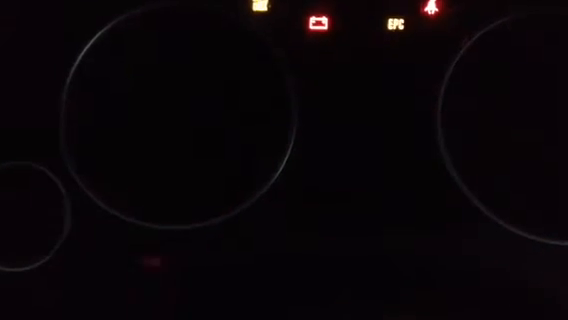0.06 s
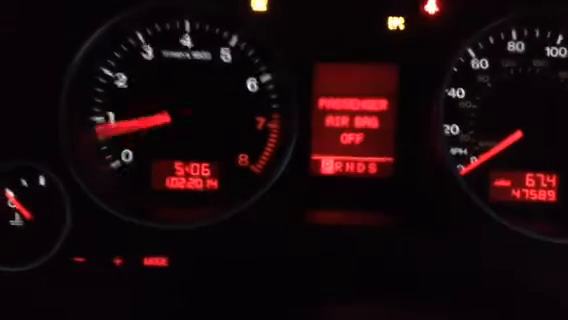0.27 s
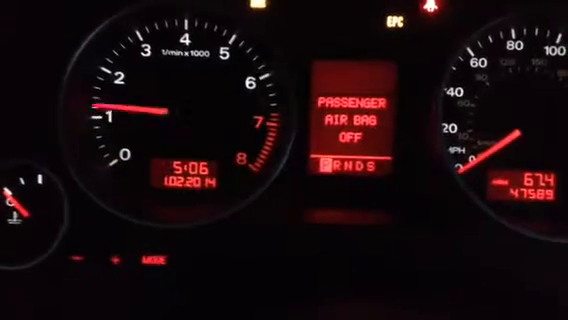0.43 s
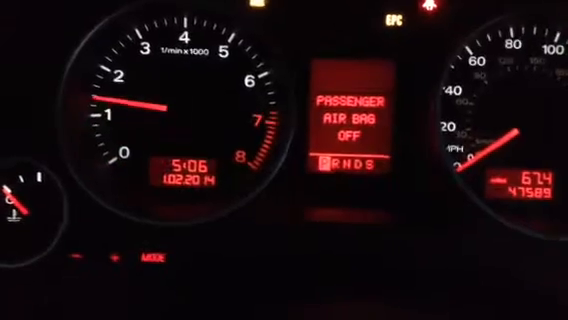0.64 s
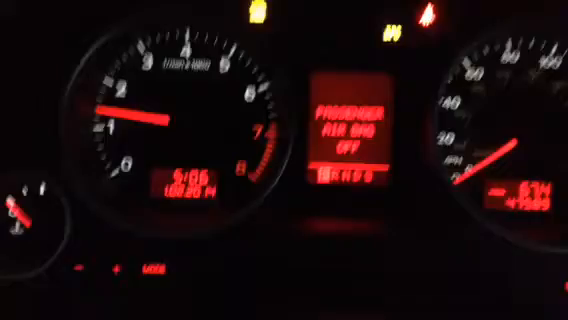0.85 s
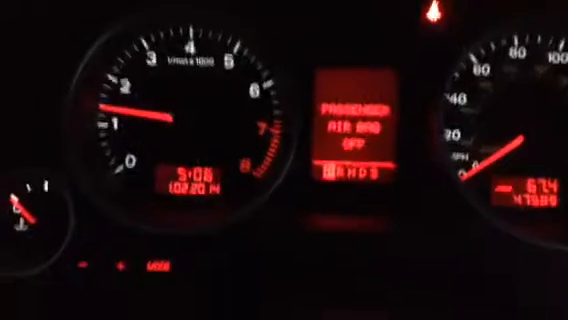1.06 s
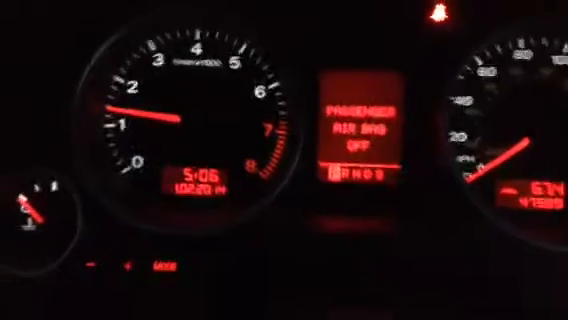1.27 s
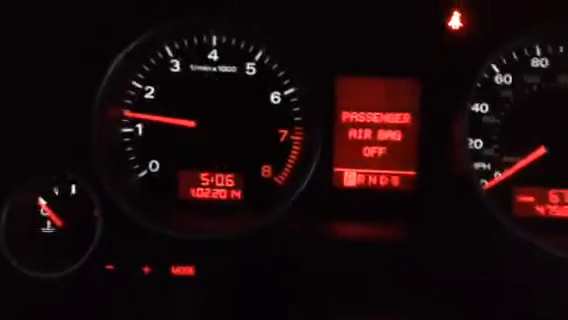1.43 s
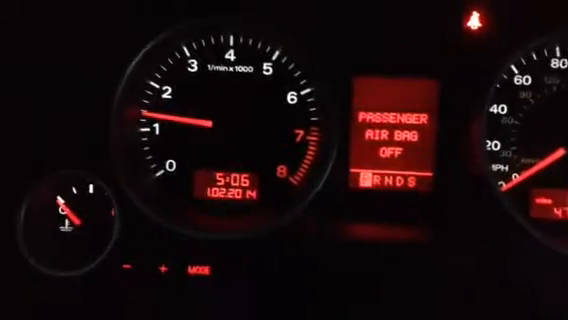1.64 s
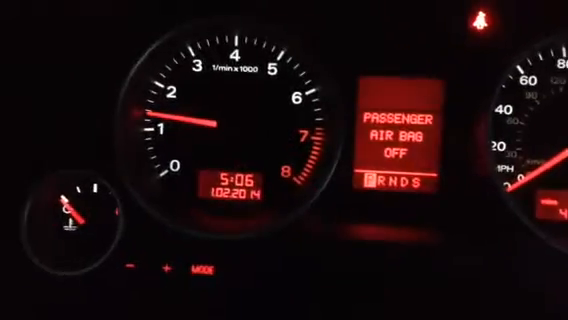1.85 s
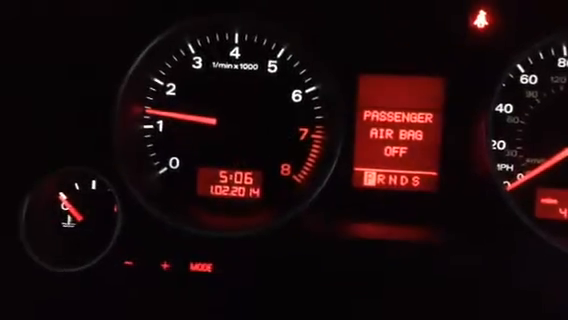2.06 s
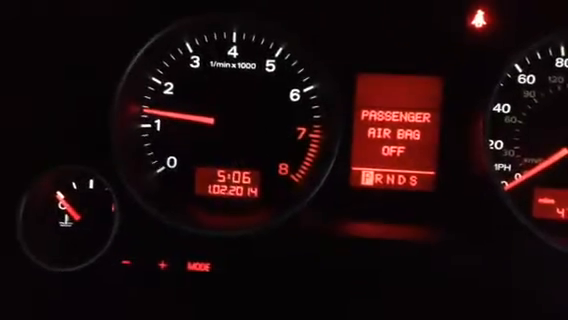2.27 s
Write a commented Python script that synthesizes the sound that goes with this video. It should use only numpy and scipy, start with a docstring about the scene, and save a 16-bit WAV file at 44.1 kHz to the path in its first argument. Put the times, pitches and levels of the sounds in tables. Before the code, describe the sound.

Car engine starting with a rumble, an ignition snap and jangling keys, then idling.

```python
"""A four-cylinder car engine starts, heard from the driver's seat. First it gathers speed, and hard firings
shake the car in a low rumble under a swelling hiss. The ignition key springs back against its stop with
a sharp snap, and the other keys on its ring collide and jangle. The hiss fades and a faint whine sinks
as the firings, filtered by the car body, settle to a fast, muffled idle. A few soft knocks sound in the
cabin along the way, the last with a brief ping."""
import sys
import numpy as np
from scipy import signal
from scipy.fft import rfft, irfft, next_fast_len
from scipy.io import wavfile
from scipy.ndimage import uniform_filter1d, map_coordinates

SR = 44100
rng = np.random.default_rng(int(sys.argv[2]) if len(sys.argv) > 2 else 0)


def persist_wave(psi):
    """Save psi, clipped to +-1, as 16-bit WAV."""
    counts = np.round(np.clip(psi, -1, 1) * 32767).astype(np.int16)
    wavfile.write(sys.argv[1], SR, np.atleast_2d(counts).T)


N = 101429

# narrow resonances of the car at idle: pitch_hz, level_db, width_hz
DRONE_MODES = [(185, -59.5, 9.81), (264.2, -54.5, 11.8), (613, -59.5, 3.5), (639, -60, 5.4),
               (849.4, -61.5, 11.5), (1210, -69.5, 10.5), (1286, -65.5, 16)]
# their common gain: time_s, gain_db
DRONE_GAIN = [(.3, -12), (.8, -0.5), (1.6, 2.5), (1.9, -2.5), (2.3, -5)]
# course of the whine: time_s, pitch_hz, level_db
WHINE_GLIDE = [(.45, 520, -77), (.58, 507, -47), (.72, 490.5, -53), (.95, 475, -53), (1.25, 464, -57.5),
               (1.7, 470, -54.5), (2.3, 450, -62)]

# knocks in the cabin: start_s, thud_db, tick_db
KNOCK_HITS = [(.164, -41, -36), (.169, -48, -36), (0.2183, -36.5, -37.5), (0.2234, -32, -35),
              (.575, -38, -41), (.859, -41.5, -58), (2.0235, -37.5, -48), (2.048, -34, -53)]
# short, dry bumps: start_s, peak_db
BUMP_HITS = [(0.2817, -25.5), (0.9766, -25), (2.0246, -39)]
# spectra of a thud, a tick and a bump: frequency_hz, relative_db
THUD_SPECTRUM = [(30, -43), (80, -24), (170, 8.5), (400, 9), (700, -11), (1400, -16.5), (4000, -24),
                 (12000, -54.5)]
TICK_SPECTRUM = [(30, -51.5), (300, -7), (1000, 2), (2500, -2), (5000, -7), (9000, -14), (15000, -28)]
BUMP_SPECTRUM = [(30, -36), (120, -6), (300, 2.5), (600, 2), (1200, -14), (2500, -14.5), (5000, -19),
                 (9000, -32.5), (15000, -45)]

# keys striking each other: start_s, clash_db, ring_db
KEY_HITS = [(0.4733, -40, -51), (0.5534, -44, -38), (.5718, -30.5, -32), (0.599, -35, -45),
            (0.6079, -26, -24), (.6548, -33.5, -42), (.6915, -39.5, -50), (.7055, -35, -34),
            (0.746, -43, -50), (0.8604, -48, -63), (1.0066, -39, -39.5), (1.206, -57, -67)]
# modes of the keys: pitch_hz, relative_db, t60_s
KEY_MODES = [(6590, -11.5, 0.1), (8430, -19, 0.077), (9500, -16, 0.17), (11100, -3.5, 0.076),
             (12610, -20, 0.064), (14550, -18, 0.19)]
# spectrum of their contact: frequency_hz, relative_db
CLASH_SPECTRUM = [(50, -51), (500, -23), (1500, -5), (3000, -11.5), (4500, -1.5), (5300, 1), (6700, 2),
                  (9000, 1), (10000, -4), (11200, -3), (12500, -9), (15000, -4)]
# single tones that ring out: start_s, pitch_hz, level_db, t60_s
KEY_PINGS = [(0.5525, 4530, -40, 0.1), (.556, 14560, -40, .25), (.704, 14550, -43, 0.2),
             (0.712, 8410, -40, 0.21), (2.049, 1875, -47.5, 0.42)]
CLATTER_FROM_S, CLATTER_TO_S, CLATTER_DB, CLATTER_SPREAD_DB = .555, 0.68, -42.5, 3

# contacts of the lock springing back: start_s, relative_db
LOCK_HITS = [(0.3563, -22), (.3576, -25), (.3592, -14.5), (0.361, -9), (0.3626, -9), (.3733, -31)]
# modes of the lock: pitch_hz, relative_db, t60_s
LOCK_MODES = [(696, -14, 0.07), (1170, -4.5, 0.049), (1318, -5, 0.045), (2137, 0, 0.02), (2930, -6, 0.048),
              (3770, -3.5, 0.027), (4450, -4, 0.029), (4880, 4.5, 0.032), (5210, -6.5, 0.037),
              (5880, 3, 0.03), (6310, 0, 0.04), (6630, -5, .028), (7930, -9.5, .03), (10140, -5, 0.022)]
# spectrum of one contact: frequency_hz, relative_db
CRACK_SPECTRUM = [(30, -58), (200, -41.5), (500, -26.5), (750, -6.5), (2000, -7), (4200, -0.5), (5100, 2.5),
                  (6500, -1), (8500, -4.5), (10000, -6), (11700, -12), (12700, -15), (15000, -19.5)]
LOCK_GAIN_DB, LOCK_RING_DB = -3, -11.5

# spectra of the start's rumble and hiss: frequency_hz, relative_db
RUMBLE_SPECTRUM = [(30, -43), (80, -21.5), (130, -8.5), (185, 1), (270, -2), (370, -7), (520, -22),
                   (850, -14), (1500, -26), (4000, -38)]
HISS_SPECTRUM = [(30, -50), (200, -16), (600, 8.5), (1300, 3.5), (2400, -3), (4200, -5), (5500, 0),
                 (8300, -2), (10000, -10.5), (11500, -17.5), (15000, -26)]
# envelope of the hiss: time_s, level_db
HISS_ENVELOPE = [(0, -52.5), (.13, -47), (.23, -43.5), (.34, -43.5), (.44, -44.5), (.55, -53.5),
                 (.75, -54.5), (1.0, -57.5), (1.4, -67), (2.3, -78)]
# modes of the engine bay, relative to the hiss: pitch_hz, relative_db, width_hz
BAY_MODES = [(812, -8, 32.7), (908, -23.5, 36), (1212, -11, 35)]
# the first hard firings: start_s, peak_db
CHUG_HITS = [(.144, -38), (.162, -37), (.184, -32.5), (.203, -34.5), (0.2213, -31), (.243, -35),
             (.255, -32), (.295, -32.5), (.31, -36), (.326, -35), (.382, -33.5)]
# modes of the car that they shake: pitch_hz, relative_db, t60_s
CHUG_MODES = [(135, -5.5, 0.067), (180, 0.5, 0.066), (282, 0, 0.042), (382, -9, 0.036)]
RUMBLE_PEAK_S, RUMBLE_RISE_S, RUMBLE_FALL_S, RUMBLE_DB = 0.24, 0.057, 0.11, -40

# engine speed: time_s, firing_rate_hz
FIRING_RATE = [(0, 17.8), (.15, 31.6), (.3, 45), (.6, 46.5), (.85, 45.7), (1.1, 45.4), (1.38, 44),
               (1.6, 46), (1.78, 45.1), (2.0, 44.2), (2.17, 41), (2.3, 42.6)]
# engine envelopes, before the gains below: time_s, firing_db, machinery_db
ENGINE_ENVELOPES = [(0, -76, -47), (.1, -77, -44.5), (.3, -48, -50), (.48, -52.5, -49.5), (.6, -45, -46),
                    (.75, -52.5, -49.5), (.86, -48.5, -49.5), (1.15, -56, -50), (1.58, -52, -50.5),
                    (1.76, -52, -51), (2.06, -49, -51), (2.3, -52.5, -51)]
# strength of each cylinder in firing order: relative_db
CYLINDER_DB = [4.5, -4, 4.5, -3]
# spectra of the car body's response and of the machinery: frequency_hz, relative_db
BODY_SPECTRUM = [(30, -53), (135, -26), (180, -15), (270, -3), (340, -1.5), (410, -10), (480, -2),
                 (550, -11.5), (625, -7), (730, -19), (860, -8.5), (1050, -34.5), (1270, -9.5),
                 (2200, -24.5), (6000, -66)]
MACHINERY_SPECTRUM = [(35, -34.5), (100, -20), (138, -16), (172, -6.5), (310, -2), (410, -10), (485, -5),
                      (530, -14.5), (630, -7), (720, -14), (850, -9), (930, -9), (1050, -15.5), (1250, -6),
                      (1420, -14.5), (1900, -14), (2300, -21.5), (2800, -26.5), (3350, -17.5), (4000, -23),
                      (5100, -22.5), (6200, -38), (7800, -35.5), (10500, -39.5), (15500, -45.5)]
# the exhaust's hum: multiple_of_firing_rate, level_db
HUM_HARMONICS = [(1, -71.5), (2, -73.5), (4, -62), (5, -63), (6, -56.5), (14, -66.5)]
# the exhaust's boom at three times the firing rate: time_s, level_db
BOOM_ENVELOPE = [(0, -85), (.5, -65), (1.06, -68), (1.12, -58), (1.3, -54.5), (1.52, -55), (1.58, -62),
                 (1.78, -66), (1.98, -55.5), (2.3, -57)]
FIRING_GAIN_DB, MACHINERY_GAIN_DB = -1.5, 1
JITTER_S, SCATTER_DB, PULSING_DEPTH, HUM_RISE_S = 0.00024, 2, 0.074, 0.94

CABIN_T60_S, CABIN_DB = 0.1, -10
LOW_CUT_HZ, HIGH_CUT_HZ = 35, 15250


def amp(db):
    """Amplitude ratio of a level in decibels."""
    return 10 ** (np.asarray(db) / 20)


def unit(x):
    """Normalisation to rms 1."""
    return x / np.sqrt(np.mean(x ** 2) + 1e-20)


def gain(spectrum, hz):
    """Magnitude response, interpolated in decibels over log frequency."""
    knots_hz, knots_db = np.transpose(spectrum)
    return amp(np.interp(np.log(hz + 1), np.log(knots_hz + 1), knots_db))


def curves(rows):
    """Linear interpolation of each column after the time, one value per sample."""
    times, *columns = np.transpose(rows)
    return [np.interp(np.arange(N) / SR, times, column) for column in columns]


def wobble(rate_hz):
    """Slow random modulation: a spline through rate_hz knots a second."""
    return map_coordinates(rng.standard_normal(200), [np.arange(N) * rate_hz / SR], mode="mirror")


def filtered(x, response):
    """Linear filtering: the spectrum of x times a frequency response."""
    size = next_fast_len(len(x) + 8192)
    return irfft(rfft(x, size) * response(np.fft.rfftfreq(size, 1 / SR)), size)[:len(x)]


def noise(spectrum):
    """Spectral shaping: white noise coloured and scaled to rms 1."""
    return unit(filtered(rng.standard_normal(N), lambda hz: gain(spectrum, hz)))


def impulse(spectrum, size=8192):
    """Minimum-phase impulse response: folding the cepstrum makes it causal."""
    cepstrum = irfft(np.log(gain(spectrum, np.fft.rfftfreq(size, 1 / SR))))
    cepstrum[1:size // 2] *= 2
    cepstrum[size // 2 + 1:] = 0
    return irfft(np.exp(rfft(cepstrum)))


def burst(spectrum, t60, size=16384):
    """Source and filter: exponentially decaying noise excites a body with this spectrum."""
    body = impulse(spectrum)
    excitation = rng.standard_normal(size) * amp(-60 * np.arange(size) / SR / t60)
    return signal.fftconvolve(excitation, body / np.linalg.norm(body))[:size]


def waver(hz, width_hz, size):
    """Phase diffusion: a random walk in phase broadens a tone's spectral line."""
    drift = np.cumsum(rng.standard_normal(size)) * np.sqrt(2 * np.pi * width_hz / SR)
    cycles = hz * np.arange(size) / SR + rng.random()
    return np.sin(2 * np.pi * cycles + uniform_filter1d(drift, size=128))


def ring(modes, vary_db, width_hz, size=16384):
    """Free vibration: a sum of damped modes, excited a little differently at each strike."""
    t = np.arange(size) / SR
    out = np.zeros(size)
    for hz, db, t60 in modes:
        decay = amp(db + vary_db * rng.normal() - 60 * t / t60)
        attack = 1 - np.exp(-t * hz)
        out += decay * attack * waver(hz, width_hz, size)
    return out


def add(track, start_s, sound):
    """Superposition of a sound on the track."""
    part = track[round(start_s * SR):][:len(sound)]
    part += sound[:len(part)]


def cabin(x):
    """Reverberation: the padded interior absorbs sound quickly, leaving a short tail."""
    tail = burst([(100, -1), (5000, -3.0), (15000, 2)], CABIN_T60_S)
    delayed_tail = np.pad(tail / np.linalg.norm(tail), (SR // 400, 0))
    return x + amp(CABIN_DB) * signal.fftconvolve(x, delayed_tail)[:N]


def drone():
    """Resonance: the running engine sustains a few narrow modes of the car."""
    gain_db, = curves(DRONE_GAIN)
    return amp(gain_db) * sum(amp(db) * waver(hz, width, N) for hz, db, width in DRONE_MODES)


def whine():
    """Modulation: a thin tone sinks in pitch, slightly unsteady in phase and amplitude."""
    hz, db = curves(WHINE_GLIDE)
    phase = 2 * np.pi * np.cumsum(hz) / SR + 0.3 * wobble(30)
    return amp(db + 1.059 * wobble(16)) * np.sin(phase)


def knocks():
    """Heavily damped impacts: each knock is a thud with a tick, each bump a single impulse response."""
    out = np.zeros(N)
    for start_s, thud_db, tick_db in KNOCK_HITS:
        add(out, start_s, amp(thud_db) * burst(THUD_SPECTRUM, t60=0.03))
        add(out, start_s, amp(tick_db) * burst(TICK_SPECTRUM, t60=0.037))
    push = impulse(BUMP_SPECTRUM)
    for start_s, peak_db in BUMP_HITS:
        add(out, start_s, amp(peak_db) * push / np.abs(push).max())
    return out


def keys():
    """Collision: swinging keys radiate broadband contact noise and ring in their high modes."""
    out = np.zeros(N)
    for start_s, clash_db, ring_db in KEY_HITS:
        add(out, start_s, amp(clash_db) * burst(CLASH_SPECTRUM, t60=0.049))
        add(out, start_s, amp(ring_db) * ring(KEY_MODES, vary_db=4.5, width_hz=65))
    for start_s, hz, db, t60 in KEY_PINGS:
        add(out, start_s, ring([(hz, db, t60)], vary_db=0, width_hz=24.7))
    # a clatter of light touches grows sparser and softer
    touches = rng.random(size=(24, 2))
    for k, (slip, strength) in enumerate(touches):
        progress = (k + slip) / len(touches)
        start_s = CLATTER_FROM_S + (CLATTER_TO_S - CLATTER_FROM_S) * progress ** 1.4
        touch_db = CLATTER_DB + CLATTER_SPREAD_DB * (strength - 2 * progress)
        add(out, start_s, amp(touch_db) * burst(CLASH_SPECTRUM, t60=0.04))
    return out


def ignition_lock():
    """Impact excitation: the key springs back to its stop in quick contacts that ring the lock."""
    out = np.zeros(N)
    for start_s, db in LOCK_HITS:
        crack = burst(CRACK_SPECTRUM, t60=0.015)
        ringing = amp(LOCK_RING_DB) * ring(LOCK_MODES, vary_db=1.5, width_hz=60)
        add(out, start_s, amp(db + LOCK_GAIN_DB) * (crack + ringing))
    return out


def engine_catching():
    """Transient response: hard firings ring the car's low modes amid a rumble and a ringing hiss."""
    from_peak_s = np.arange(N) / SR - RUMBLE_PEAK_S
    width_s = np.where(from_peak_s < 0, RUMBLE_RISE_S, RUMBLE_FALL_S)
    swell = np.exp(-.5 * (from_peak_s / width_s) ** 2)
    hiss_db, = curves(HISS_ENVELOPE)
    bay = sum(amp(db) * waver(hz, width, N) for hz, db, width in BAY_MODES)
    rumble = amp(RUMBLE_DB) * swell * noise(RUMBLE_SPECTRUM)
    hiss = amp(hiss_db + 0.53 * wobble(49.1)) * (noise(HISS_SPECTRUM) + bay)
    out = rumble + hiss
    for start_s, peak_db in CHUG_HITS:
        chug = ring(CHUG_MODES, vary_db=3.5, width_hz=13)
        add(out, start_s, amp(peak_db) * chug / np.abs(chug).max())
    return out


def exhaust(cycles):
    """Harmonics of the firing rate: a hum builds as the idle steadies, and the third harmonic booms."""
    hum = sum(amp(db + 2.2 * wobble(6)) * np.sin(2 * np.pi * (k * cycles + rng.random()))
              for k, db in HUM_HARMONICS)
    fade_in = np.clip(np.arange(N) / SR / HUM_RISE_S, 0, 1)
    boom_db, = curves(BOOM_ENVELOPE)
    return hum * fade_in + amp(boom_db) * np.sin(2 * np.pi * 3 * cycles)


def machinery(cycles, level_db):
    """Amplitude modulation: mechanical noise pulses at the firing rate."""
    pulsing = 1 + PULSING_DEPTH * np.cos(2 * np.pi * cycles)
    return noise(MACHINERY_SPECTRUM) * pulsing * amp(level_db + 0.4 * wobble(15))


def firings(cycles, level_db):
    """Forced vibration: a pulse train from four unequal cylinders drives the car body."""
    onsets = np.flatnonzero(np.diff(np.floor(cycles)))
    jitter, scatter = rng.standard_normal((200, 2))[:len(onsets)].T
    onsets += np.round(JITTER_S * SR * jitter).astype(int)
    pulses = np.zeros(N)
    pulses[np.clip(onsets, 0, N - 1)] = amp(np.resize(CYLINDER_DB, len(onsets)) + SCATTER_DB * scatter)
    body = burst(BODY_SPECTRUM, t60=.14)
    return unit(signal.fftconvolve(pulses, body)[:N]) * amp(level_db)


def engine():
    """Synchronous sources: firings, machinery and exhaust share one phase, the firing rate's integral."""
    rate_hz, = curves(FIRING_RATE)
    firing_db, machinery_db = curves(ENGINE_ENVELOPES)
    cycles = np.cumsum(rate_hz) / SR
    thumps = firings(cycles, firing_db + FIRING_GAIN_DB)
    whirr = machinery(cycles, machinery_db + MACHINERY_GAIN_DB)
    return thumps + whirr + exhaust(cycles)


def scene():
    """Superposition of the engine beyond the dashboard and the close sounds with their reverberation."""
    beyond_dashboard = engine() + drone() + engine_catching() + whine()
    close_by = ignition_lock() + keys() + knocks()
    return (beyond_dashboard + cabin(close_by))[None]


def record(dry):
    """Band limiting: a high-pass removes the deepest bass, a steep low-pass the highest treble."""
    high_passed = filtered(dry[0], lambda hz: hz ** 4 / np.hypot(hz ** 4, LOW_CUT_HZ ** 4))
    return filtered(high_passed, lambda hz: 1 / np.sqrt(1 + (hz / HIGH_CUT_HZ) ** 240))[None]


dry = scene()
out = record(dry)
persist_wave(out)
```